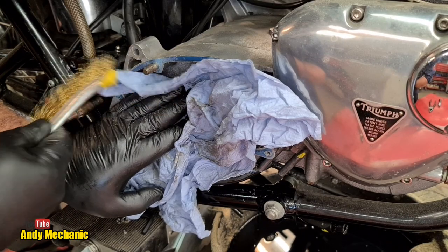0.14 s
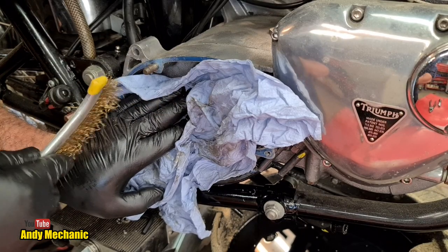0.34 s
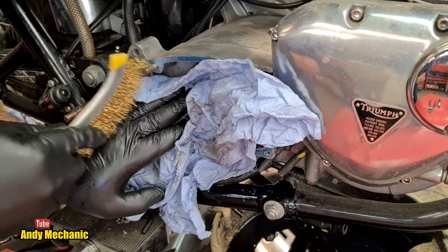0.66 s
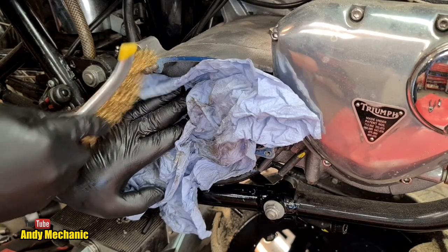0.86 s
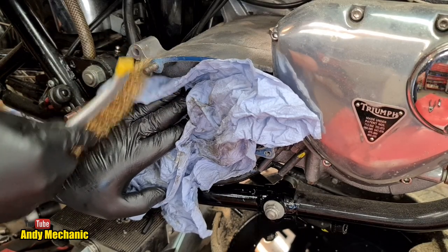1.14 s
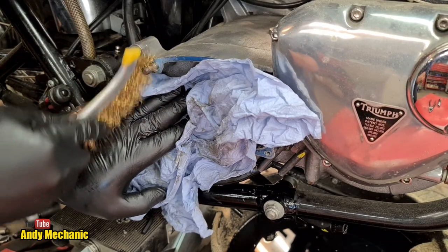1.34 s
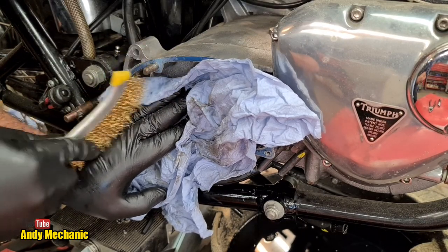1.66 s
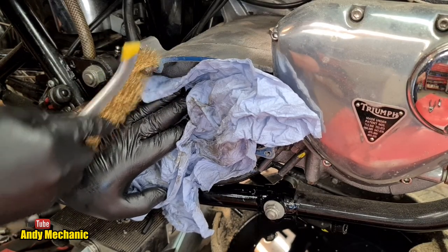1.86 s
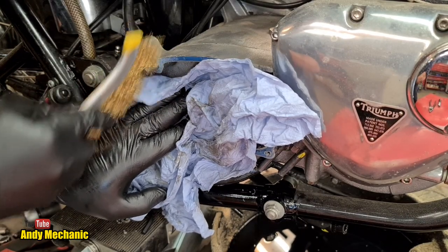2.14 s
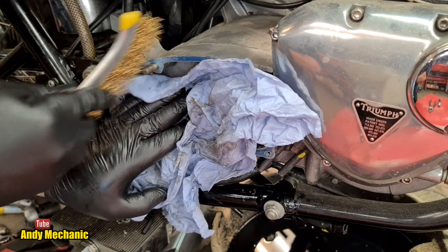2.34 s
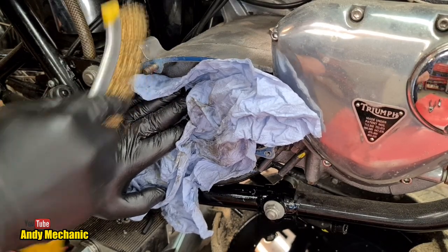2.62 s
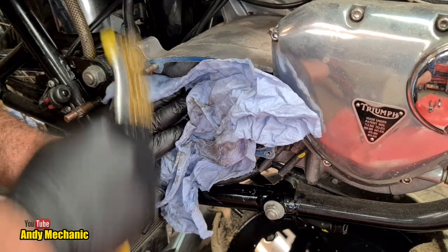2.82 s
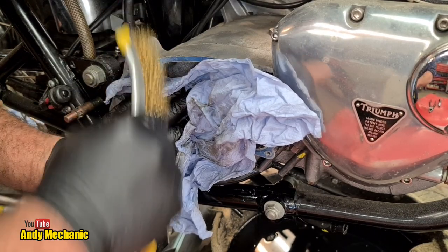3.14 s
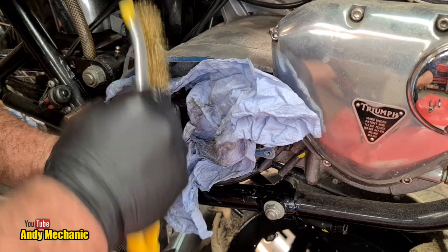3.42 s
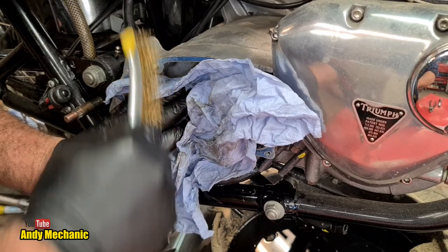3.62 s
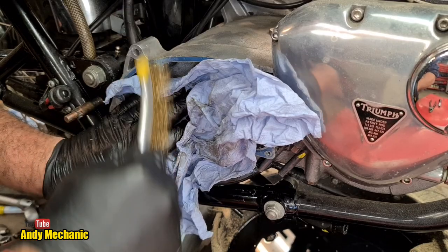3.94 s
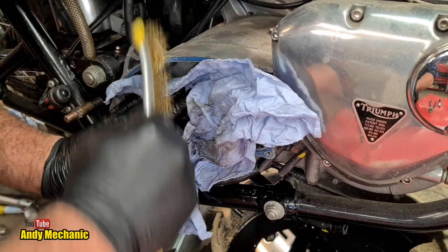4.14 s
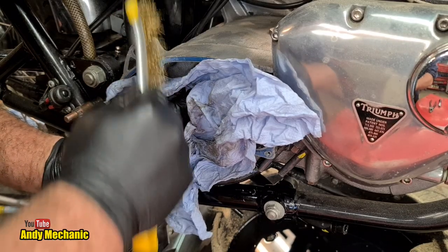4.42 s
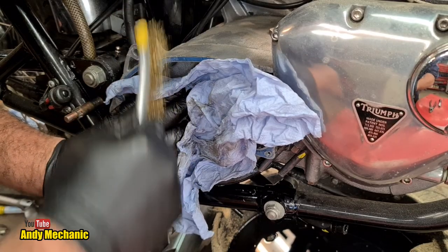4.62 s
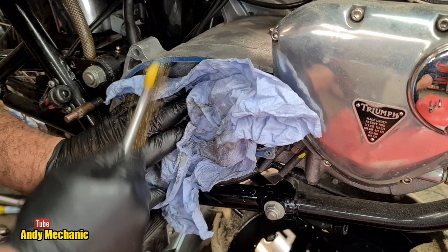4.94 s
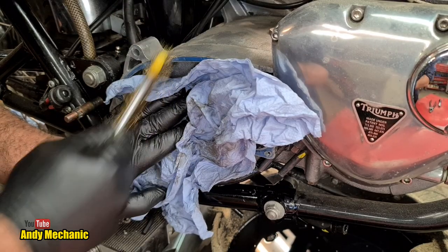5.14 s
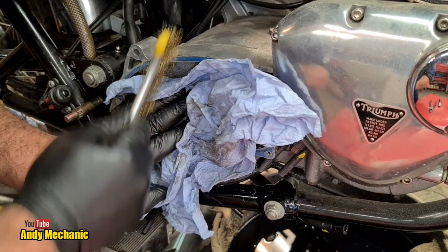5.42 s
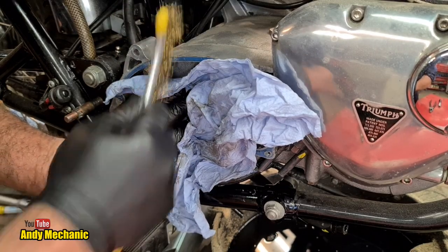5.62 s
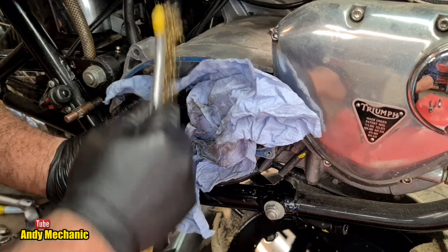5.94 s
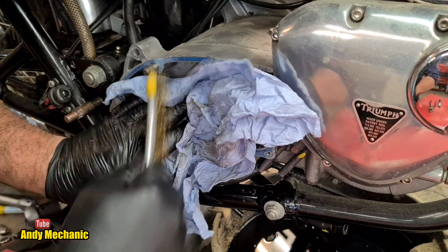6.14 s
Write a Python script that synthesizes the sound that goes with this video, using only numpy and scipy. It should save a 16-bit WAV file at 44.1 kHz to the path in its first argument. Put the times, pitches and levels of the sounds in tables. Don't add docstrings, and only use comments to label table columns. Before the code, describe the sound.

Dry, gritty wire bristles rasp on hollow metal, soft short strokes giving way to brisk regular swipes, with ticking snaps and faint hum behind.

```python
import sys
import numpy as np
from scipy import signal
from scipy.fft import rfft, irfft, next_fast_len
from scipy.io import wavfile
from scipy.ndimage import uniform_filter1d

SR = 44100
rng = np.random.default_rng(int(sys.argv[2]) if len(sys.argv) > 2 else 0)


def rack_gain(trim_db):
    fader = np.asarray(trim_db, float)
    return 10 ** (fader / 20)


def dump_mix(stems):
    frames = np.atleast_2d(stems).T
    limited = np.clip(frames, -1, 1)
    pcm = np.round(limited * 32767).astype(np.int16)
    wavfile.write(sys.argv[1], SR, pcm)


N = 276507
SIZE = next_fast_len(N + 8000)

# landing/s, rise/s, hold/s, peak level/dB, lower casing ring re scrape/dB
SWIPES = [(2.378, 0.05, 0.066, -32.5, -19), (2.772, 0.048, 0.052, -37, -18), (3.12, 0.04, 0.053, -32.5, -6),
          (3.451, 0.04, 0.038, -31.5, -36), (3.74, 0.078, 0.032, -31, -17), (4.084, 0.062, 0.059, -31, -14),
          (4.414, 0.045, 0.074, -32, -12), (4.755, 0.062, 0.065, -31, -17.5),
          (5.06, 0.069, 0.068, -32, -27), (5.398, 0.052, 0.056, -32.5, -17.5),
          (5.699, 0.09, 0.045, -31, -18), (6.022, 0.065, 0.052, -30, -9)]
# f/Hz, level/dB
FAR_SHADE = [(100, 3), (400, -1.5), (2300, 0), (3500, -3.5), (5200, -2.5), (7400, -11.5), (9500, -5),
             (14000, -5.5), (20000, -7)]


def unit(x):
    return x / np.sqrt(np.mean(x ** 2))


def shape(points):
    hz, db = np.transpose(points)
    bins_hz = np.fft.rfftfreq(SIZE, 1 / SR)
    return rack_gain(np.interp(np.log(bins_hz + 1), np.log(hz), db))


def rings(modes):
    f = np.fft.rfftfreq(SIZE, 1 / SR)
    total = 0
    for k, (hz, width, db) in enumerate(modes):
        sign = (-1) ** k
        total = total + sign * rack_gain(db) * 1j * f * width / (hz ** 2 - f ** 2 + 1j * f * width)
    return total


def through(x, response):
    return irfft(rfft(x, SIZE) * response, SIZE)[..., :N]


def ring(x, response):
    return through(x, response / np.sqrt(np.mean(np.abs(response) ** 2)))


def walk(rate):
    k = int(SR / rate)
    held = np.repeat(rng.standard_normal(N // k + 1), k)
    return unit(uniform_filter1d(held, k)[:N])


def flicks(per_second, scatter_db, patchy_db, slow_db):
    chance, strength, direction = rng.random((3, N))
    size = np.minimum(rack_gain(-scatter_db * np.log(strength + 1e-9)), 5.)
    patch = rack_gain(patchy_db * walk(500) + slow_db * walk(110))
    return unit((chance < per_second / SR) * np.sign(direction - .5) * size * patch)


def trailing():
    # t/s, level/dB
    drag = [(0, -48), (.05, -41.5), (.16, -56.5), (.36, -64.5), (.56, -56), (1.3, -59), (1.8, -57.5),
            (2.07, -60.5), (2.35, -56), (2.5, -71), (2.97, -78), (3.1, -62.5), (3.4, -75), (5.6, -93),
            (5.85, -52.5), (6.02, -58.5), (6.27, -63)]
    level = np.interp(np.arange(N) / SR, *np.transpose(drag))
    layers_db = np.array([[0], [-5], [-2.5], [-5.5]])
    return rack_gain(level + layers_db) ** 2


def tufts():
    # t/s, peak level/dB, tip fizz re
    # peak/dB, casing ring re peak/dB
    snaps = [(.001, -17, -12, -28), (0.017, -22, -7, -24), (0.095, -8, -7, -4.5), (0.1165, -16.5, -5, -7),
             (0.119, -29, -8, -6), (0.1437, -14.5, -8, -4), (0.153, -14.5, -3, -13),
             (0.8937, -15.5, -17, -15.5), (1.296, -33, -1, -2), (1.305, -32, -5, -9),
             (1.3307, -15.5, -4, -18), (1.4, -23, -10, -20), (1.4983, -33, -9, 2), (1.5291, -35.5, -3, 8),
             (1.609, -18.5, -6, -4), (2.0587, -27, -7, -7), (2.3, -31, -2, 0), (2.419, -21, -1, -15),
             (2.514, -18.5, 1, -10), (2.796, -15.5, -12, -17), (2.807, -29, -5, -20),
             (3.248, -24, 5.5, -15), (3.259, -35, 10, -17), (3.871, -16.5, -17, -11),
             (4.213, -15, -14, -27), (4.2512, -26, -14, -27), (4.4217, -20.5, -15, -22),
             (4.479, -17, -20, -32), (4.5394, -14, -19, -24), (4.5594, -26, -1, -28),
             (5.531, -14, -6, -26), (5.7229, -23, -6, -3), (6.047, -32, -10, -10),
             (0.026, -19, -10, -25), (0.126, -15, -11, -3), (0.628, -18.5, -9, -3),
                   (0.651, -15, -11, -17), (0.6684, -17, -11, -20), (0.6784, -20, -9, -23),
                   (0.687, -20, -12, -16), (0.8154, -23, -14, -17), (0.831, -15, -16, -15),
                   (0.849, -19, -11, -11), (0.9183, -24, -9, -18), (0.924, -16, -10, -19),
                   (1.0762, -21.5, -3, -17), (1.11, -19, -6, -21), (1.1416, -15, -6, -24),
                   (1.1588, -15.5, 4, -26), (1.173, -13.5, 2, -25), (1.194, -18, -14, -22),
                   (1.202, -21, -12, -23), (1.3922, -21, 5, -22), (1.433, -16, -5, -22),
                   (1.536, -28.5, -3, 1), (1.5844, -32, -11, -16), (1.5944, -38, -8, -14),
                   (1.6594, -26, -5, -16), (1.829, -26, -5, -16), (1.854, -23, 2, -24),
                   (1.8704, -19, 3, -23), (1.892, -14, -6, -19), (1.941, -19, -10, -8),
                   (1.9894, -24, 1, -29), (2.0124, -37, 9, -14), (2.142, -28, -10, -20),
                   (2.1705, -18, -9, -21), (2.229, -17.5, 0, -9.5), (2.3214, -37, -10, -12),
                   (2.333, -24, -12, -9),
             (2.4290, -17.5, -10, -19), (2.4374, -21, -9, -21), (2.4473, -12, -3, -24),
                   (2.462, -16, 2, -18), (2.4864, -21, -7, -16), (2.788, -18, -14, -18),
                   (2.89, -40, -11, -19), (3.149, -16, -14, -25), (3.1956, -10.5, -16, -26),
                   (3.2164, -27, -9, -18), (3.5, -14, -16, -12), (3.5194, -31, -14, -16),
                   (3.5475, -19.5, -21, -18), (3.7594, -33, -3, -16), (3.8194, -27, -13, -16),
                   (3.8494, -26, -15, -11), (4.0956, -24, -13, -18), (4.18, -10, -17, -22),
                   (4.2214, -35, -15, -22), (4.787, -19, -9, -22), (4.8714, -26, -18, -22),
                   (5.16, -18, 2, -23), (5.209, -20, 2, -13), (5.4251, -35, -11, -16),
                   (5.4844, -30, -11, -16), (5.4994, -31, -10, -18), (5.7964, -19, -16, -18),
                   (5.8494, -34, -8, -16), (5.9384, -35, -18, -14), (6.0696, -25, -17, -24),
                   (6.0944, -17, -16, -16), (6.106, -14, -19, -16), (6.116, -16, -18, -7),
                   (6.1444, -28, -15, -12), (6.1592, -15, -9, -17)]
    # t/s, peak level/dB, tip fizz re peak/dB
    scrub_tufts = [(0.0463, -18, -9), (0.0629, -11, -18), (0.0785, -26, -15), (0.136, -15, -10),
                   (0.576, -25.5, -13), (0.588, -13, -11), (0.62, -20.5, -5), (0.6385, -18, -6),
                   (0.7851, -27, -7), (0.8229, -21, -6), (0.8615, -14, -9), (0.918, -15, -3),
                   (0.971, -14, -3.5), (1.051, -34, 3), (1.1298, -18, 5), (1.3184, -23, -3),
                   (1.414, -23, 4), (1.5545, -22.5, -10), (1.5715, -17, -1.5), (1.6418, -10, 1),
                   (1.6741, -29, -3), (1.8021, -27.5, -7), (1.846, -21.5, -1), (2.1044, -25, -9),
                   (2.117, -18, -14), (2.1545, -17.5, -5), (2.1691, -19, -8), (2.2075, -23, -10)]
    swipe_tufts = [(2.395, -21, -12), (2.4109, -21, -9), (2.7775, -27, -6), (2.8358, -19, -18),
                   (2.8665, -20, -19), (3.1223, -27, -12), (3.1488, -22, -21), (3.1864, -20, -22),
                   (3.4585, -29, -15), (3.4807, -21, -13), (3.7409, -24.5, -8), (3.7896, -20.5, -4),
                   (4.1305, -35, -14), (4.1554, -16, -17), (4.4955, -15, -24), (4.509, -13, -27),
                   (4.7545, -21.5, -9.5), (4.811, -26, -16), (4.8299, -22, -22), (4.8479, -13, -18),
                   (5.0599, -30, -18), (5.1003, -41, -11), (5.121, -22, -3), (5.3983, -19, -6.5),
                   (5.461, -13.5, -17), (5.6994, -27, -10), (5.767, -19, -7), (5.8232, -24, -18),
                   (6.0292, -27, -17), (6.069, -30, -7)]
    events = snaps
    tuft_db = 4
    for rows, casing_db in ((scrub_tufts, -27), (swipe_tufts, -16)):
        events = events + [(at, db + tuft_db, tip_db, casing_db) for at, db, tip_db in rows]

    power = np.zeros((4, N))
    u = np.arange(2000) / SR
    rise_s, decay_s = 0.00081, 0.00162
    burst = (1 - np.exp(-u / rise_s)) * np.exp(-u / decay_s)
    for at, db, tip_db, casing_db in events:
        i = int(at * SR)
        layers_db = np.array([[0], [tip_db], [casing_db + 0.5], [casing_db - 7]])
        power[:, i:i + 2000] += (rack_gain(db - 3.5 + layers_db) * burst[:N - i]) ** 2
    return power


def strokes(rows, grip, sing, lift_s):
    touch_s, light_share = 0.0064, 0.43
    power = np.zeros((5, N))
    scrape, tip, upper, lower = np.array(grip)
    for at, rise, hold, db, lower_db in rows:
        steps = [at - touch_s, touch_s, light_share * rise, (1 - light_share) * rise, hold, lift_s, lift_s]
        s = np.cumsum(steps)
        i = np.arange(int(s[0] * SR), min(int(s[-1] * SR), N))
        layers = (0, tip, upper, lower + lower_db, np.array(sing))
        for k, relative_db in enumerate(layers):
            points_db = np.r_[-80, db + scrape + relative_db, -120]
            power[k, i] += rack_gain(np.interp(i / SR, s, points_db)) ** 2
    return power


def ribs():
    crossings = [(0.125, 0.1, -52, -34.5), (0.576, .03, -45.5, -54), (0.643, .03, -52, -64),
                 (0.823, 0.05, -47, -69), (0.917, 0.11, -45.5, -52), (1.06, 0.025, -46, -50),
                 (1.328, 0.037, -44, -55), (1.575, 0.057, -46, -58), (2.063, 0.019, -48, -39),
                 (2.119, 0.017, -36.5, -64), (2.161, 0.029, -36.5, -60), (2.331, 0.026, -42.5, -41.5),
                 (2.456, 0.063, -60, -34), (2.497, 0.041, -36.5, -40), (2.825, 0.054, -38.5, -59),
                 (3.196, 0.11, -62, -38.5), (3.214, 0.019, -38, -39), (3.519, 0.071, -40.5, -54),
                 (3.809, 0.063, -48, -45.5), (4.475, 0.059, -60, -38), (4.801, 0.045, -62, -43),
                 (4.856, 0.017, -52, -63), (5.175, 0.074, -41, -58), (5.797, 0.055, -44, -46.5),
                 (5.863, .04, -45.5, -70), (6.091, 0.076, -60, -42), (6.148, .03, -42, -57)]
    power = np.zeros((4, N))
    for at, length, upper_db, lower_db in crossings:
        i = np.arange(int((at - length / 2) * SR), int((at + length / 2) * SR))
        power[2:, i] += (rack_gain([[upper_db], [lower_db]]) * np.hanning(len(i))) ** 2
    return power


def surges():
    changes = [(0.106, 0.02, -10.5), (0.146, 0.0088, 2), (0.16, .02, -1), (0.592, 0.01, -3.5),
               (0.795, 0.013, 2.5), (0.846, 0.01, -13), (0.853, .014, 3), (0.91, 0.015, 4.5),
               (0.957, 0.021, -13), (1.076, 0.01, 1), (1.147, 0.016, 4.5), (1.581, 0.015, 5.5),
               (1.667, 0.0087, 3), (1.698, 0.021, 6), (1.994, 0.009, 3), (2.04, 0.047, 9.5),
               (2.135, 0.014, -17), (2.384, 0.021, 2), (2.41, 0.015, 3.5), (2.435, 0.0093, 6),
               (2.462, 0.0078, -3), (2.496, 0.021, -8), (2.863, 0.012, 1.5), (2.889, 0.012, 10),
               (3.125, .012, -2.5), (3.144, 0.013, 4.5), (3.17, 0.023, -6), (3.204, 0.018, -4.5),
               (3.27, .02, -13), (3.513, 0.011, -5), (3.48, 0.013, 1.5), (3.556, 0.026, 5),
               (3.576, .03, -8), (3.772, 0.015, -3), (3.86, 0.027, 3.5), (3.9, 0.037, -2),
               (4.11, 0.025, -3), (4.15, 0.01, -3), (4.227, 0.019, 4), (4.235, 0.016, -14),
               (4.549, 0.012, 3), (4.871, 0.013, -3), (4.89, 0.016, -11), (5.071, 0.011, 1),
               (5.086, 0.021, -8), (5.117, 0.012, 2.5), (5.185, .014, -4), (5.219, 0.016, 6.5),
               (5.24, .02, -14), (5.463, 0.0034, 2), (5.506, .014, -2), (5.709, 0.0099, 9.5),
               (5.749, 0.024, -5.5), (5.765, 0.019, 1.5), (6.041, .012, -9), (6.081, .016, 2.5)]
    db = np.zeros(N)
    for at, length, change_db in changes:
        i = np.arange(int((at - length / 2) * SR), int((at + length / 2) * SR))
        db[i] += change_db * np.hanning(len(i)) ** .5
    return rack_gain(db)


def pressure():
    # landing/s, rise/s, hold/s, peak level/dB, lower casing ring re scrape/dB
    scrubs = [
        (0.044, 0.032, 0.031, -27.5, -27),
        (0.57, 0.09, 0.036, -35.5, -23),
        (0.785, 0.11, 0.086, -37.5, -29),
        (1.05, 0.096, 0.037, -36, -19.5),
        (1.315, 0.092, 0.028, -35, -18),
        (1.55, 0.097, 0.029, -34.5, -19.5),
        (1.84, 0.082, 0.016, -32.5, -16.5),
        (2.1, 0.061, 0.053, -32.5, -19.5),
    ]
    scrub_grip = [
        (-8, -10, 1, 0.5, -44.5),
        (-11, -1, -3.5, -1, -8),
        (-4, -5, -10.5, -19.5, -53),
        (4, 2, 0.5, -3, -5),
    ]
    swipe_grip = [
        (-16, -9.5, 1, -3, -53),
        (-16, -8.5, -9.5, -3, -6),
        (-6, -7.5, -21.5, -8.5, -14),
        (-10, -13, 0, -6.5, 0),
    ]
    scrub_sing = (-22, -5, -11, -17, -22)
    swipe_sing = (-34, -31, -9.5, 1, -22)
    power = strokes(scrubs, scrub_grip, scrub_sing, lift_s=0.086)
    power += strokes(SWIPES, swipe_grip, swipe_sing, lift_s=0.12)
    power[:4] += trailing() + ribs() + tufts()
    return np.sqrt(power) * surges()


def brush(drive):
    # f/Hz, level/dB
    wire_colour = [(1500, -94), (2600, -13.5), (3600, -7.5), (4200, -5.5), (5200, 3), (6000, -6.5),
                   (7000, -3), (8500, -10), (11000, -31)]
    tip_colour = [(6000, -26.5), (8500, -8), (10000, -6), (12000, 0.5), (14300, 5), (16000, -4),
                  (20000, -26)]
    sing_colour = [(2500, -67), (3700, -52), (4400, -6), (4900, 13), (5500, 5), (6400, -10), (9000, -45)]
    # f/Hz, width/Hz, level/dB
    wire_rings = [(3594, 310, -2), (5150, 47, -22), (5060, 37, -27), (5194, 200, 13), (6040, 330, 2)]
    casing_low = [(1095, 60, 1.8), (1327, 57, 9), (1503, 69, 0.58), (1650, 38, 1.9)]
    casing_high = [(2088, 520, 0.5), (2243, 75, 11.5), (2640, 380, -9), (2935, 68, 4.5), (2346, 60, -4)]
    upper_colour = shape([(1200, -11.5), (1900, 0.0), (3000, 5.5), (5000, -7.5)])
    lower_colour = shape([(700, -8.0), (1050, -2.0), (1700, 7.0), (2600, -16.5)])

    tips = flicks(per_second=20000., scatter_db=2.1, patchy_db=1.4, slow_db=.4)
    wires = ring(tips * drive[0], shape(wire_colour) + rack_gain(-3.5) * rings(wire_rings))
    fizz = ring(tips * drive[1], shape(tip_colour))
    upper = ring(tips * drive[2], (0.2 + rings(casing_high)) * upper_colour)
    lower = ring(tips * drive[3], (0.38 + rings(casing_low)) * lower_colour)
    singing = ring(tips * drive[4], shape(sing_colour))
    return wires + singing + rack_gain(1.0) * fizz + rack_gain(5.0) * upper + lower


def glove():
    # t/s, level/dB
    shifts = [(0.108, -44.5), (.6, -61), (1.41, -57), (2.06, -55.5), (2.22, -61), (2.34, -52), (3.249, -55),
              (3.89, -59), (4.19, -56), (4.54, -62), (4.85, -74), (5.19, -64), (5.76, -58), (6.16, -50.5)]
    # t/s, level/dB
    steady = [(0, -60.5), (2.3, -72), (2.6, -77), (5.6, -87), (5.8, -56), (6.27, -71)]
    t = np.arange(N) / SR
    rise_db_s, fall_db_s = 244, 265
    levels = [db - np.maximum(rise_db_s * (at - t), fall_db_s * (t - at)) for at, db in shifts]
    levels.append(np.interp(t, *np.transpose(steady)))
    return np.sqrt(np.sum(rack_gain(levels) ** 2, axis=0))


def hand():
    # t/s, peak level/dB, f/Hz
    knocks = [(0.045, -59, 310), (0.085, -50, 296), (0.1, -41, 582), (0.135, -46.5, 479), (0.473, -60, 294),
              (0.644, -54, 303), (0.788, -51, 283), (1.767, -58, 286), (2.059, -52, 340),
              (2.329, -45.5, 297), (3.878, -49, 280), (4.515, -44.5, 304), (4.847, -51, 308),
              (5.764, -46, 354), (6.158, -42, 313)]
    # f/Hz, level/dB
    handle = [(100, -15), (200, -2.5), (310, 2), (450, -11), (750, -3), (1100, -20)]
    out = np.zeros(N + 4000)
    u = np.arange(4000) / SR
    thud = np.exp(-u / 0.026) * (1 - np.exp(-u / 0.00058))
    for at, db, hz in knocks:
        i = int(at * SR)
        out[i:i + 4000] += rack_gain(db) * np.sin(2 * np.pi * hz * u) * thud
    rub = flicks(per_second=1500., scatter_db=12.0, patchy_db=-0.5, slow_db=1.5) * glove()
    return out[:N] + rack_gain(1.0) * ring(rub, shape(handle))


def microphones(x, clutter_db, count):
    u = np.arange(800) / SR
    places = np.array([walk(160) for _ in range(count)])
    places = places / np.sqrt(np.sum(places ** 2, axis=0))
    echoes = rng.standard_normal((count, 2, 800)) * np.exp(-u / 0.0038) * (u > .0002)
    echoes = rfft(echoes / np.sqrt(np.sum(echoes ** 2, axis=2, keepdims=True)), SIZE)
    colour = shape([(250, -9), (600, 1.5), (1300, -2.5), (3000, 2.0), (6000, 1.5), (9000, 4.5), (20000, 3.0)])
    clutter = np.sum(rfft(x * places, SIZE)[:, None] * echoes * colour, axis=0)
    lag_samples = 8.38
    far = shape(FAR_SHADE) * np.exp(-2j * np.pi * np.fft.rfftfreq(SIZE) * lag_samples)
    both = (rfft(x, SIZE) + rack_gain(clutter_db) * clutter) * np.array([np.ones_like(far), far])
    return irfft(both, SIZE)[:, :N]


def shop(x):
    t60_s, tail_db = 0.22, -13.5
    u = np.arange(SR // 2) / SR
    low_noise, high_noise = rng.standard_normal((2, 2, len(u)))
    low = signal.lfilter(*signal.butter(2, 6500, fs=SR), low_noise) * rack_gain(-60 * u / t60_s)
    high = rack_gain(3) * high_noise * rack_gain(-60 * u / (0.7 * t60_s))
    tail = (low + high) * (1 - np.exp(-u / 0.003))
    tail = tail / np.sqrt(np.sum(tail ** 2) / 2)
    return rack_gain(tail_db) * signal.fftconvolve(x[None], tail, axes=1)[:, :N]


def background():
    # f/Hz, level per Hz/dB
    hiss_colour = [(15, -32), (25, -11), (97, -2.5), (170, -12), (293, -7), (405, -14.5), (591, -14),
                   (1070, -18), (1330, -14), (5280, -14), (8590, -19), (14000, -17), (16000, -20.5)]
    # f/Hz, rms level/dB
    hum_tones = [(50.6, -71.5), (100, -70.5)]
    t = np.arange(N) / SR
    mid, side = rng.standard_normal((2, N))
    side = through(side, shape([(30, -4), (300, -6.5), (700, 1.5), (20000, -0.5)]))
    shade = shape(FAR_SHADE)
    pair = through(np.array([mid + side, mid - side]), shape(hiss_colour) * np.array([np.ones_like(shade), shade]))
    hiss = unit(pair) * rack_gain(-61 + 3.0 + walk(6.8) / 2)

    hum = 0
    for hz, db in hum_tones:
        phase = 2 * np.pi * hz * t + 1.6 * walk(6.6)
        hum = hum + rack_gain(db + 3.5 + 3.0 * walk(11)) * np.sin(phase)

    rumble = through(pair, shape([(40, 2), (150, -8), (400, -6)])) / np.std(pair)
    rumble = rumble * (t < 2.1) * rack_gain(-58 + 5.3 * walk(8.9))
    return hiss + rumble + hum * rack_gain([[-1.5], [1.5]])


def squeaks():
    # t/s, length/s, start f/Hz, end f/Hz, level/dB
    slides = [
        (3.0, .135, 7100, 9200, -65),
        (2.99, .07, 12700, 14200, -68),
        (3.07, .06, 12500, 13700, -63),
        (3.015, .04, 8300, 9900, -70),
        (3.335, .04, 7300, 7400, -71),
        (.37, .17, 8600, 9050, -67),
        (3.378, .078, 7450, 6800, -64),
        (3.025, .03, 13900, 14300, -67),
        (5.91, .11, 1800, 1740, -63),
        (5.85, .14, 2320, 2250, -65),
    ]
    out = np.zeros(N)
    flutter, wobble = rack_gain(3.5 * walk(160)), 1 + .006 * walk(290)
    for at, length, from_hz, to_hz, db in slides:
        i = int(at * SR)
        u = np.arange(0, 1, 1 / (length * SR))
        glide = to_hz + (from_hz - to_hz) * (1 - u) ** 1.6
        hz = glide * wobble[i:i + len(u)]
        tone = np.sin(2 * np.pi * np.cumsum(hz) / SR)
        out[i:i + len(u)] += rack_gain(db) * np.sqrt(np.sin(np.pi * u)) * tone
    return out * flutter * rack_gain([[0], [-3.]])


def scene():
    near = brush(pressure()) + hand()
    swiping = np.arange(N) > SWIPES[1][0] * SR - 4000
    side = rack_gain(1.3 * np.array([[-.5], [.5]]) * swiping)
    direct = rack_gain(-2.0) * side * microphones(near, clutter_db=-2.0, count=6)
    return direct + shop(near) + background() + squeaks()


def low_pass(x):
    return signal.sosfilt(signal.butter(12, 16980, fs=SR, output="sos"), x)


def record(dry):
    cut = signal.ellip(10, .3, 60, 15950, fs=SR, output="sos")
    mix = signal.sosfilt(cut, dry)
    return low_pass(mix)


dry = scene()
out = record(dry)
dump_mix(out)
```